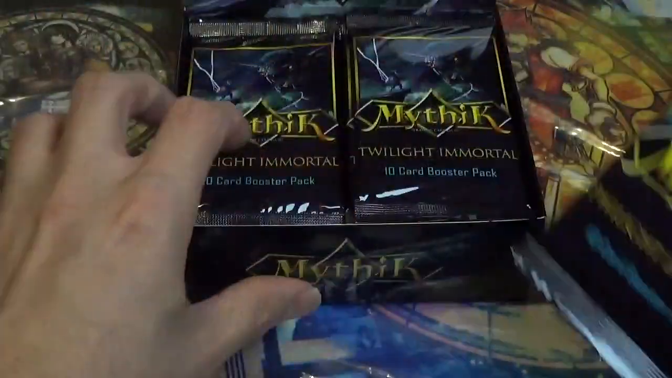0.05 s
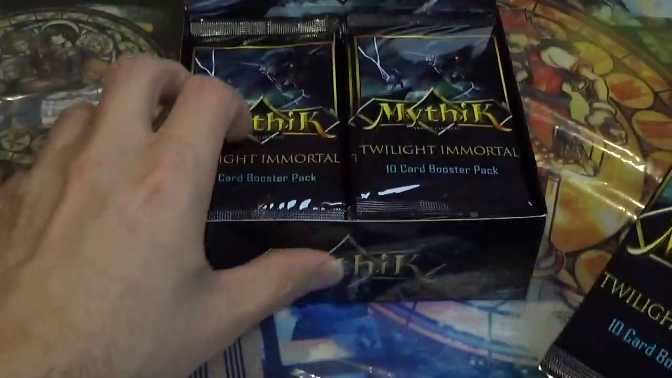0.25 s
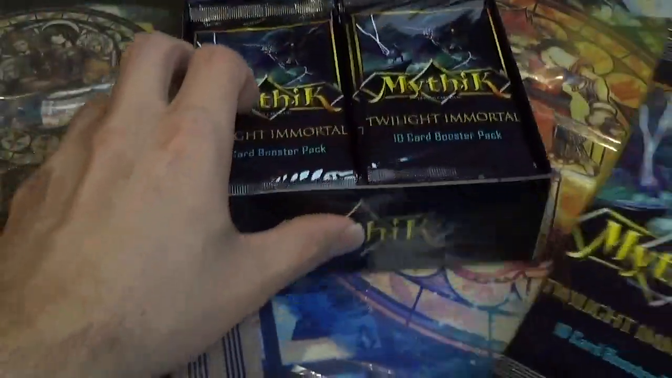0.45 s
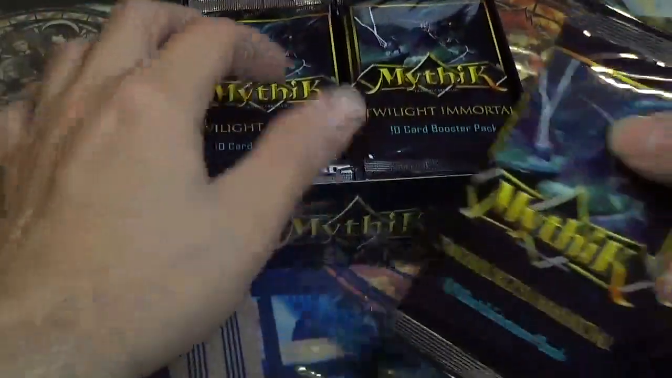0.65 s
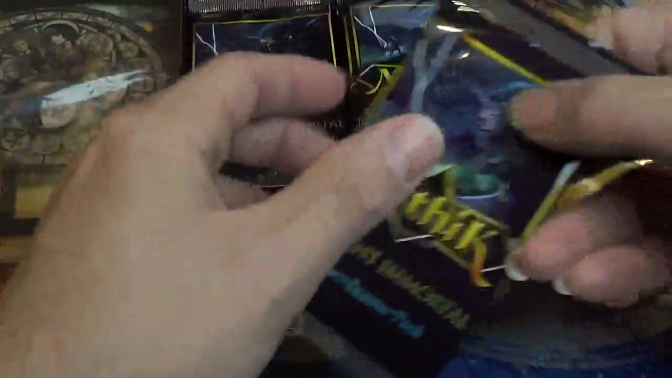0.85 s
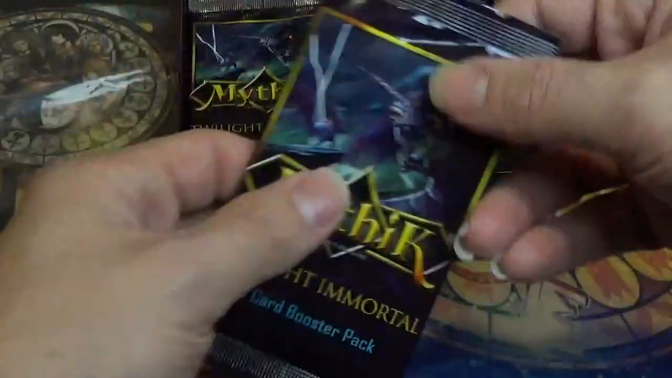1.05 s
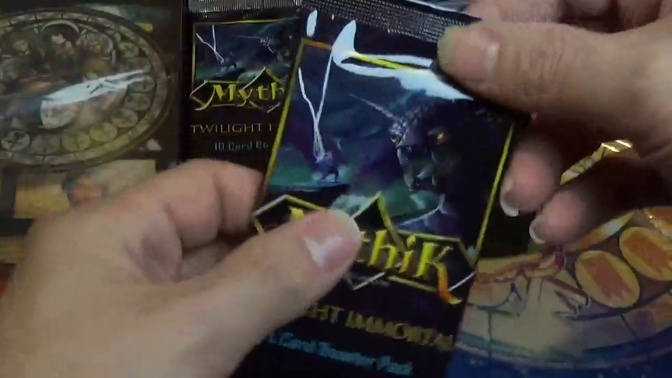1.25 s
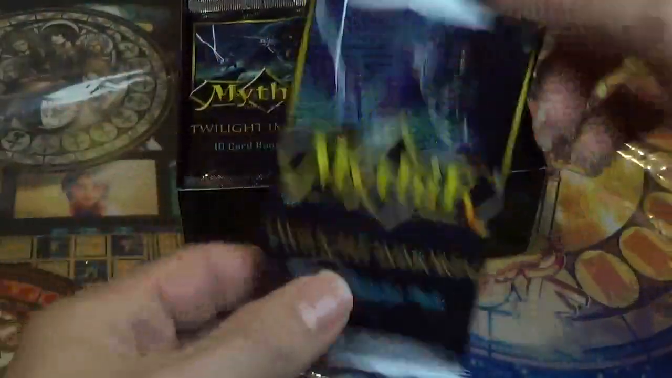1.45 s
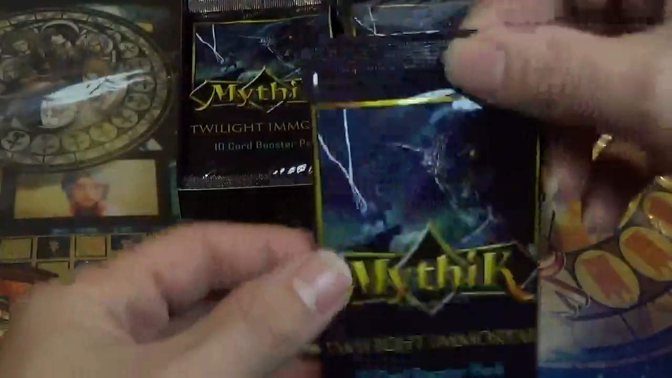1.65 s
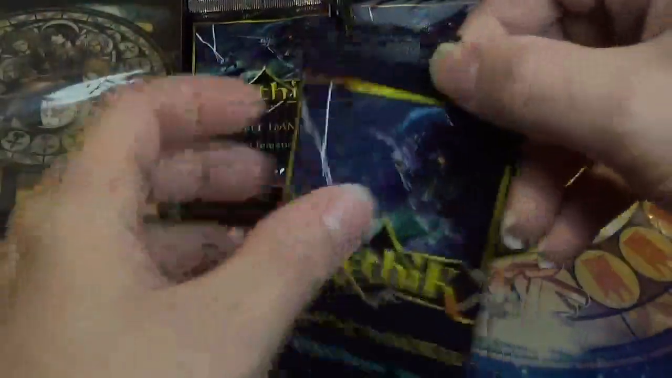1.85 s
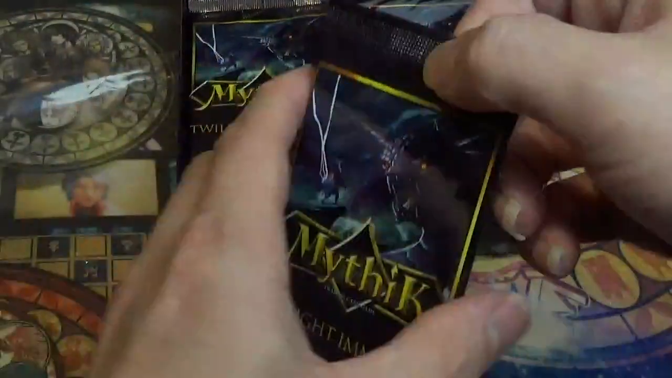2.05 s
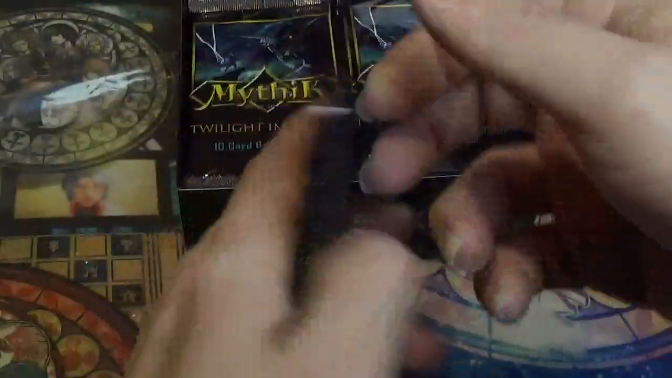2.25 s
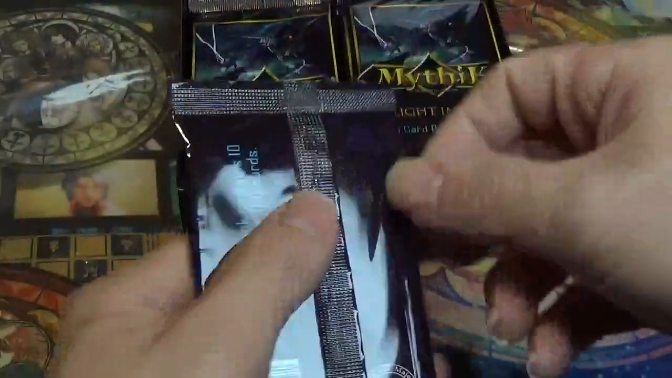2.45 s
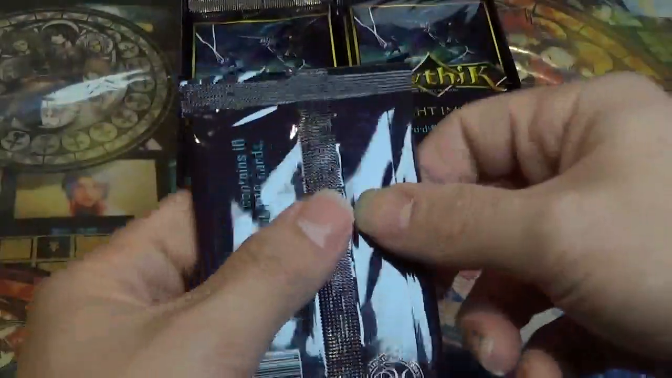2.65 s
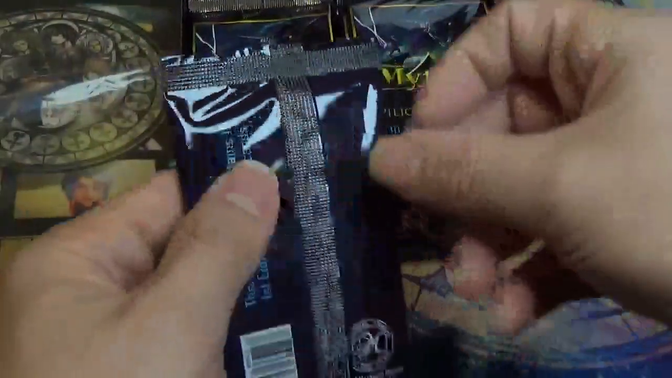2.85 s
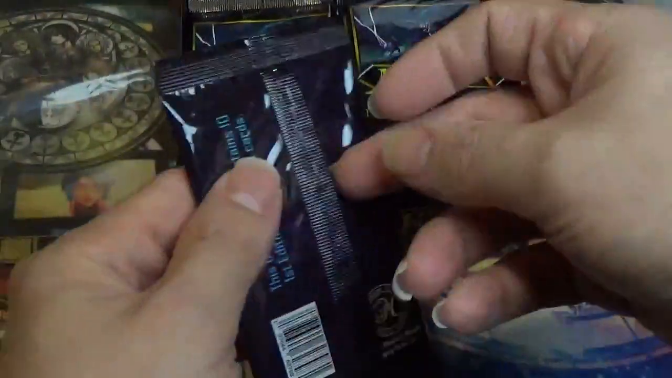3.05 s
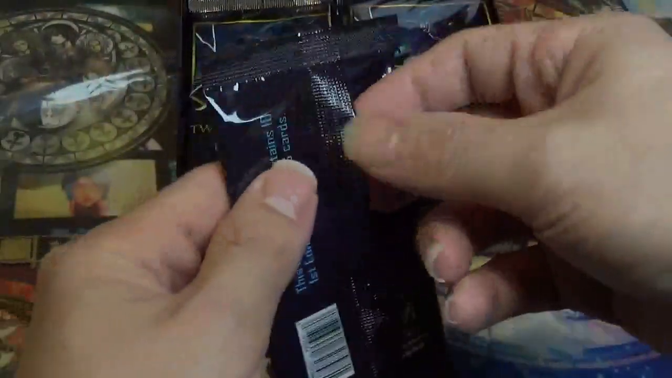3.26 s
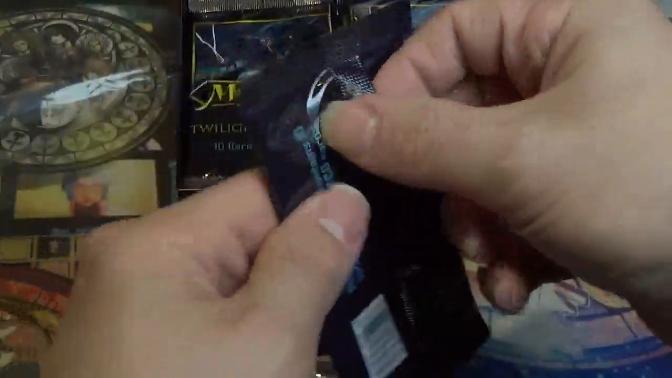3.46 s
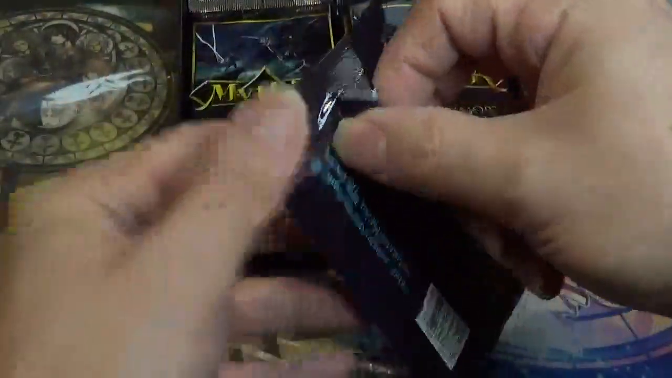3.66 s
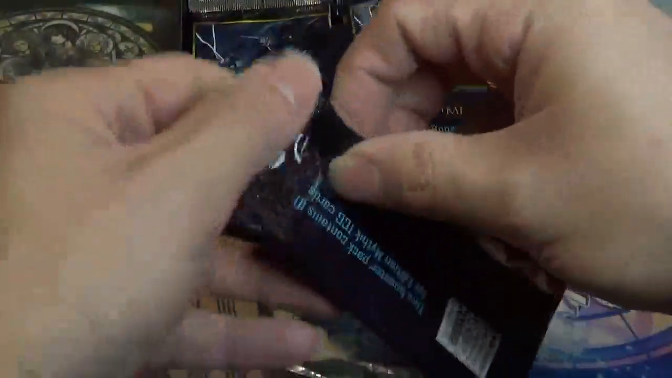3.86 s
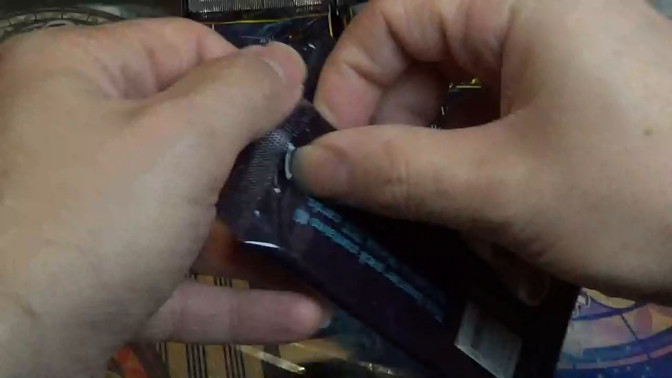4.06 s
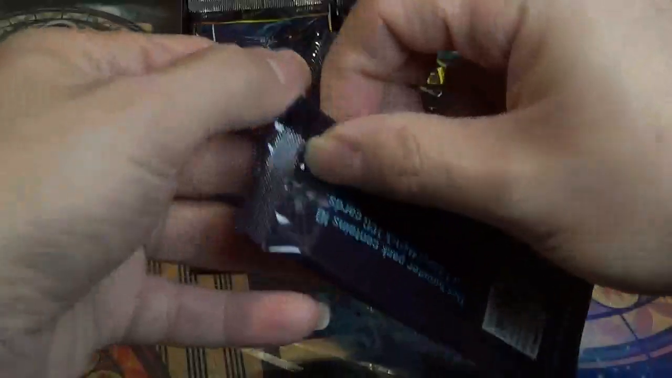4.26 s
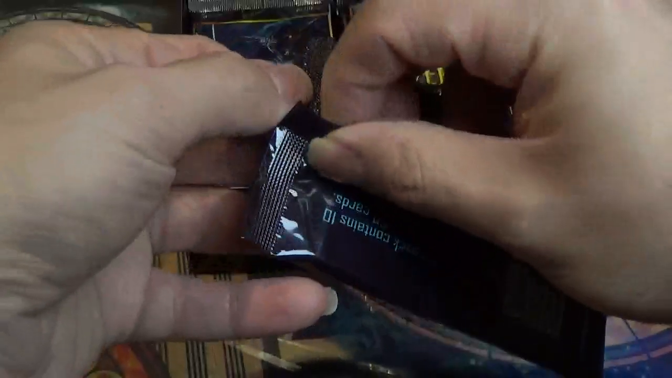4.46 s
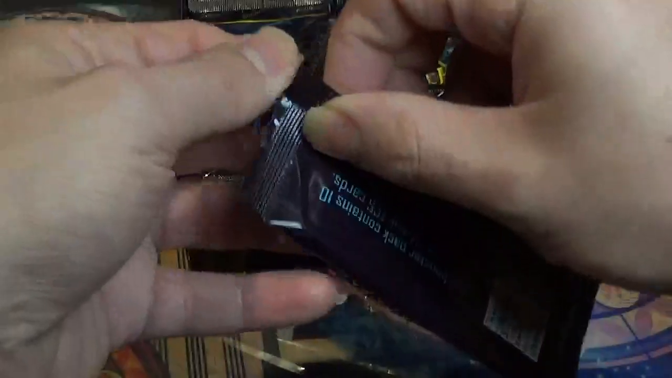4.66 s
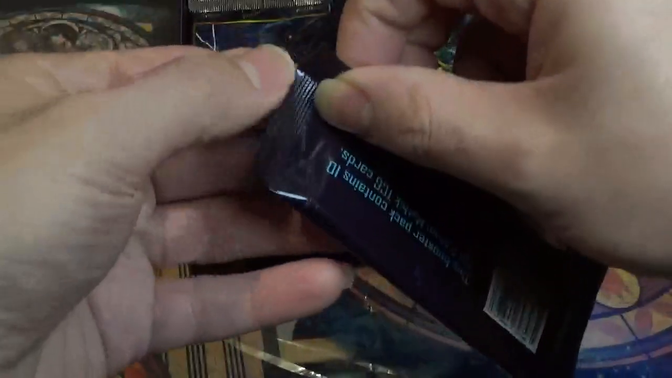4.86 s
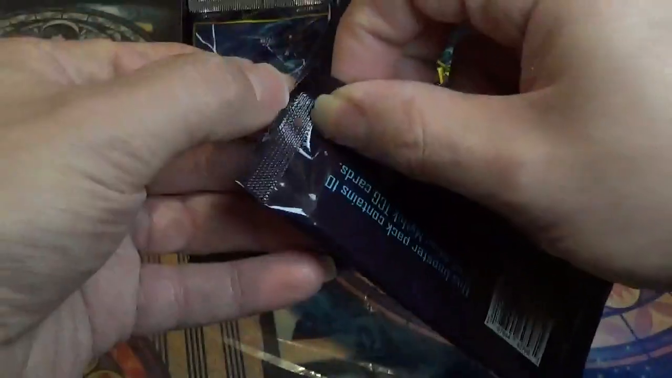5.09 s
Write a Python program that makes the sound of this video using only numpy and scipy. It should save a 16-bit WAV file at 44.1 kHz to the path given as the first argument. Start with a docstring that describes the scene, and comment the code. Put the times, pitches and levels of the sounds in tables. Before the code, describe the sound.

Recorded closely in stereo in a small room with quiet air and a barely audible wavering low hum. Two soft, dull cardboard knocks come at about 0.2 and 0.3 s, with a tiny foil crackle just after. From 0.45 to 1.2 s fingers swish faintly over film with a hollow rustle. Crisp bright crinkles appear at 1.25 to 1.7 s, with sharper ticks at 1.85 and 1.9 s. Between 2.0 and 2.5 s the packet is turned over: crackles thicken, a low soft thump lands near 2.37 s, and hollow rustle swells. It quiets from 2.5 to 3.1 s, with light rubbing and a few ticks. From 3.2 s snaps grow louder, strongest around 3.55 to 3.6 s, with short ripping bursts near 3.55, 3.8 and 4.25 s. Dense, dry, irregular foil snapping and brief tears continue through 4.9 s, still crackling at the end.

```python
"""Creases of a foil pack of cards snap one by one, each a buckling impulse that excites ringing facets.
The pack is lifted from a cardboard box, turned over and pulled open close by in a small room.
The seam rips in dense runs of fractures, and fingers slide on the film by stick and slip.
Box and cards knock softly as decaying modes; noise in a gliding band makes a hollow rustle.
Coloured noise and a faint, wavering sine give the room air and its hum."""
import sys
import numpy as np
from scipy import signal
from scipy.fft import rfft, irfft, next_fast_len
from scipy.io import wavfile

SR = 44100
rng = np.random.default_rng(int(sys.argv[2]) if len(sys.argv) > 2 else 0)


def transcribe(u):
    """Save the signal u as a 16-bit wav file named by the first command-line argument.

    u: samples, shape (n,) or (channels, n), limited to [-1, 1]; the rate is SR.
    q: integer samples, one column per channel.
    """
    v = np.clip(np.atleast_2d(u).T, -1, 1)
    q = np.round(v * 32767).astype(np.int16)
    wavfile.write(sys.argv[1], SR, q)


N = 225965
TIME = np.arange(N) / SR

# clearest crease snaps, levels before the common trim: (time [s], level [dB],
# body re level [dB], top re level [dB], facet ring [Hz])
CREASE_SNAPS = [(.318, -42, 2.5, -13, 3270), (0.3271, -46, 1, -9, 2100), (0.3315, -47.5, 7, -15, 2090),
                (.3435, -42.5, -13, -14, 4800), (0.3572, -33.5, -4, -6.5, 4750),
                (.4608, -51.5, 2.5, -5, 3630), (0.5601, -52.5, 3.5, -20, 1210),
                (1.2531, -30.5, -11.5, -5.5, 6340), (1.3333, -36, -14.5, -2, 5840),
                (1.3416, -42, -3, -2, 5570), (1.377, -44.5, -10, -5, 5900), (1.4003, -43, -7, -3.5, 5530),
                (1.5547, -41.5, -8, 4.5, 5100), (1.624, -41, -9.5, -5, 5430), (1.6668, -43, -11, 2.5, 5500),
                (1.848, -29.5, -22, 1.5, 5430), (1.9198, -29.5, -13, -1.5, 5650),
                (1.9692, -47, -4, -12, 2200), (2.0151, -42.5, 5.5, 5, 2300), (2.046, -40, 0.5, 2.5, 2650),
                (2.0522, -38.5, -31, -8, 4680), (2.116, -37.5, -11.5, -10, 4770),
                (2.1823, -39.5, -14, 6, 9200), (2.2153, -43, 7, 6, 2650), (2.236, -40.5, 4.5, 11.5, 2530),
                (2.2649, -34, -3, 0, 4500), (2.281, -35, -8.5, -1.5, 7960), (2.3904, -28, -10, -2, 5600),
                (2.4643, -33, -11, -7, 5500), (2.4766, -27.5, -37, -14, 4970),
                (2.4845, -32, -11, -2.5, 5550), (2.607, -48, -20, -20, 4900), (2.6303, -48, 1, 0.5, 7900),
                (2.648, -55.5, 7, 7, 5230), (2.9308, -34, -19, -20, 4900), (2.955, -46, 0, -4.5, 5750),
                (3.133, -44, -12, -27, 4760), (3.1545, -40.5, -8, -7.5, 4800), (3.2077, -32, -12, 2, 4140),
                (3.2167, -34, -4.5, 4.5, 9800), (3.242, -29, -18, -12, 4150), (3.251, -49, -17, 12, 5400),
                (3.2654, -25, -17.5, -5, 4670), (3.2828, -44.5, -11.5, 7, 10200),
                (3.2937, -37, -11, -11, 4370), (3.2963, -31.5, -11, -4.5, 9550),
                (3.4376, -30.5, -16.5, -2.5, 5200), (3.499, -44, -1.5, -0.5, 4430),
                (3.5426, -21, -20.5, -5.5, 3500), (3.558, -24.5, -20, -4, 4850), (3.582, -39, -18, 5, 6100),
                (3.5997, -25, -15, 2.5, 4040), (3.6021, -24.5, -11.5, -21, 6400),
                (3.6156, -47, -8, 6, 6860), (3.6708, -44.5, -12, -20, 3860), (3.6993, -34, -16, 1, 5560),
                (3.7088, -43.5, -8, -13, 4170), (3.721, -50, 3.5, -12, 1690), (3.735, -51, 5, -1, 2050),
                (3.796, -26, -17.5, -7, 4430), (3.806, -26.5, -3.5, 1, 3330),
                (3.8077, -26.5, -8, -14, 4420), (3.817, -27.5, -7.5, -1.5, 3930),
                (3.827, -34.5, -12, -14, 3600), (3.8457, -43, -4.5, 1, 5370),
                (3.8782, -36.5, -14, -18, 4170), (3.9646, -33.5, -6, -4.5, 6400),
                (3.9841, -30, -16, -3, 4460), (4.0166, -27.5, -10, -4, 4140), (4.0639, -30, -26, 7.5, 4560),
                (4.0704, -38, -4.5, 6, 6030), (4.084, -26, -13.5, -10, 4560), (4.102, -25, -16, -2.5, 4020),
                (4.1975, -28, -10.5, 2, 2300), (4.232, -38, 4.5, -20, 1330), (4.2491, -36, -10, 3.5, 4280),
                (4.2542, -32, -6.5, -14, 5870), (4.2958, -27.5, -17.5, 3.5, 9400),
                (4.3326, -28, -7.5, -1, 4450), (4.3512, -31, -29, 7, 5560), (4.3823, -26.5, -18, -6, 3640),
                (4.3957, -26.5, -4, 2.5, 8800), (4.4042, -45.5, -24, 11, 5270),
                (4.4384, -32, -22, -4, 4250), (4.5417, -25, -5, -14, 1880), (4.5706, -43.5, -9, -4, 5650),
                (4.5811, -49, 6, -8, 1110), (4.5897, -34, -9, 2, 9750), (4.5963, -36.5, -2, -5, 5340),
                (4.6264, -44, 5.5, 9, 7600), (4.6337, -34, -4, -3.5, 5500), (4.668, -29.5, -17.5, 5, 8940),
                (4.6763, -37.5, -6, -1, 6300), (4.7045, -42, -7, 4.5, 9800),
                (4.7584, -32.5, -12, 0.5, 5040), (4.815, -34, -10, 2, 8100), (4.8606, -31.5, -1, 1, 2920),
                (4.8773, -31.5, -7.5, -26, 4000), (4.8912, -33.5, -19, -27, 2690),
                (4.949, -41, -7.5, 10, 5600), (4.9734, -28.5, -9, -4, 5600),
                (4.992, -35.5, -5.5, -4.5, 3530), (5.0295, -43, -10.5, -18, 6170)]
# frequency bands of a snap, two for the body and two above: (lower edge [Hz], upper edge [Hz])
SNAP_BAND_EDGES = [(720, 1480), (1850, 3250), (3300, 6500), (6500, 11500)]
# broad resonances of the wrapper: (frequency [Hz])
WRAPPER_MODES_HZ = [1034, 2144, 4840]
# seam tearing, before a common trim:
# (start [s], end [s], level [dB], growth from start to end [dB], tilt [dB/octave])
SEAM_RIPS = [(0.324, 0.348, -43.5, -2, 0), (1.39, 1.426, -48.5, 12, 2.5), (2.222, 2.296, -44, 6, 6),
             (2.377, 2.5, -49, 2, 4), (3.199, 3.31, -61, -26, 0.5), (3.541, 3.6, -37.5, 1.5, 5.5),
             (3.776, 3.826, -37, 6, 4), (4.058, 4.108, -43.5, 3, 3.5), (4.245, 4.305, -39.5, 8, 5.5),
             (4.322, 4.419, -52, -16, 4), (4.689, 4.705, -39, 11, 6.5), (4.87, 4.893, -39, -8.5, 2)]
# spectrum of the rips: (frequency [Hz], relative spectral level [dB])
RIP_SPECTRUM = [(200, 2), (500, -1), (1000, 3), (2200, 0), (4500, -2), (7000, -6.5), (11000, -9)]
# fingers swishing over the film, before a common trim:
# (start [s], end [s], level [dB], growth from start to end [dB], tilt [dB/octave])
FINGER_SWISHES = [(.461, .525, -53.5, -3, -1.5), (.555, .62, -53.5, 6, -2), (.70, .81, -56, 9, -1.5),
                  (.81, .895, -58.5, -16, 5), (.942, 1.04, -52.5, -13, 18), (1.06, 1.2, -55.5, 11, 1.5),
                  (1.455, 1.492, -52.5, -11, 1), (1.502, 1.522, -49, -9, 5), (2.31, 2.365, -55.5, 19, 8),
                  (2.5, 2.63, -63, 8, 10), (2.69, 2.83, -59, -2.5, 7.5), (3.32, 3.37, -48.5, 16, -1),
                  (3.37, 3.42, -49, -2, 0), (3.64, 3.77, -53.5, -1, .5), (3.84, 3.92, -57.5, -7, 2),
                  (3.95, 4.06, -62.5, -25, 1), (4.145, 4.175, -49, -12, 1.5), (4.205, 4.245, -51, 16, 3),
                  (4.79, 4.815, -55, 22, 0.5), (4.935, 5.01, -54, -14, 2.5)]
# spectrum of skin on film: (frequency [Hz], relative spectral level [dB])
SWISH_SPECTRUM = [(200, -1), (500, -6), (1200, 1.5), (1700, -3), (2500, -1), (4000, 2), (5200, 2.5),
                  (6200, 0), (7400, -4), (8600, -3), (10000, 0), (11000, -7.5)]
# how busily the fingers rub, before a common trim: (time [s], level [dB])
RUB_LEVEL = [(0, -63), (.26, -62), (.38, -54.5), (.67, -67), (1.05, -60.5), (1.6, -58.5), (1.75, -65.5),
             (2.0, -59), (2.14, -64), (2.3, -57), (2.9, -68.5), (3.15, -64), (3.6, -58), (4.4, -62.5),
             (4.51, -71), (4.58, -57.5), (4.9, -62.5), (5.12, -68)]
# hollow rustle between the hands, before a common trim: (time [s], level [dB])
HOLLOW_LEVEL = [(0, -66), (.25, -78), (.54, -61), (1.68, -66), (1.85, -83), (2.12, -98), (2.24, -55),
                (2.33, -83), (2.43, -49.5), (2.55, -59.5), (2.95, -67.5), (3.5, -57.5), (3.85, -64.5),
                (4.9, -67), (5.12, -72)]
# resonance of the hollow rustle, following the grip: (time [s], frequency [Hz])
GRIP_RESONANCE = [(.58, 480), (.75, 571), (1.0, 516.2), (2.3, 500), (2.7, 380), (3.3, 390), (3.7, 460)]
# knocks of box and cards, before a common trim:
# (time [s], level [dB], contact cut-off [Hz], time to decay 60 dB [s])
SOFT_KNOCKS = [(0.1955, -32.5, 2760, 0.061), (0.3008, -29, 620, 0.036), (.33, -49, 1500, 0.36),
               (.358, -42, 1200, 0.072), (.461, -41.5, 2500, 0.038), (1.041, -43, 3000, 0.028),
               (1.923, -48, 910, 0.036), (1.961, -41, 2000, 0.019), (2.173, -39.5, 643, 0.038),
               (2.265, -42.5, 798, 0.15), (2.372, -29, 490, 0.022)]
# modes of the cardboard: (frequency [Hz], relative level [dB])
CARDBOARD_MODES = [(170, -17), (291, -8.5), (400, -2), (500, 1), (650, -11), (904, -2), (1082, -8),
                   (1260, -7.5), (1604, -21), (2300, -4)]
# spectrum of the room air: (frequency [Hz], relative spectral level [dB])
AIR_SPECTRUM = [(25, -6), (60, -5), (110, -3), (250, 4), (500, -2.5), (1000, -2.5), (3000, -9),
                (11000, -12.5)]

# a crease of FIRM_DB buckles in BUCKLE_S; the time doubles for each BUCKLE_DOUBLING_DB below it
FIRM_DB, BUCKLE_S, BUCKLE_DOUBLING_DB = -30, 0.00064, 15
FACET_Q = 5  # ring frequency over bandwidth
# facets that ring within about FACET_OCTAVES of FACET_HZ ping most clearly
FACET_HZ, FACET_OCTAVES, FACET_LIFT_DB = 2650, 0.64, 9
LOW_DB, LOW_MID_DB = -1, -3.2  # offsets of the two body bands of a snap
BASS_CUT_HZ = 160  # thin film radiates little bass
ROOM_T60_S, ROOM_DB, ROOM_WIDTH = 0.19, -13.5, 0.65
CUTOFF_HZ = 11200


def snaps(after_db=-5, ring_db=6, side_db=-1.0, side_width_hz=600, detune_octaves=0.091,
          flutter_db=-22, recoil_db=4, trim_db=-6.0, size=700, count=6):
    """Impulsive buckling: a crease jumps, neighbours follow within milliseconds, and freed facets ring."""
    out, t = np.zeros(N + size), np.arange(size) / SR
    bands = [signal.butter(2, edges, "band", fs=SR, output="sos") for edges in SNAP_BAND_EDGES]
    for s, db, body_db, top_db, ring_hz in CREASE_SNAPS:
        buckle_s = BUCKLE_S * 2 ** ((FIRM_DB - db) / BUCKLE_DOUBLING_DB)
        force = from_db(flutter_db) * rng.standard_normal(size) * np.exp(-t / buckle_s)
        force[0] += 1
        follow = np.minimum(rng.uniform(0.23, 1.9, count) * buckle_s * SR, size - 1).astype(int)
        force[follow] += from_db(after_db) * rng.uniform(0.41, 1, count) * rng.choice([-1, 1], count)

        lift_db = FACET_LIFT_DB * np.exp(-(np.log2(ring_hz / FACET_HZ) / FACET_OCTAVES) ** 2)
        ring = resonance(force, ring_hz, ring_hz / FACET_Q)
        facet = force + from_db(ring_db + lift_db) * ring
        # each fold detunes the wrapper
        detune = 2 ** rng.normal(0, detune_octaves, len(WRAPPER_MODES_HZ))
        for hz in WRAPPER_MODES_HZ * detune:
            facet += from_db(side_db) * resonance(force, hz, side_width_hz)

        low_db = body_db + LOW_DB - lift_db / 2
        low_mid_db = body_db + LOW_MID_DB + lift_db / 2
        band_db = np.array([low_db, low_mid_db, 0, top_db])
        gains = from_db(db + band_db) * [1, -1, 1, -1]  # signs let the bands join
        snap = sum(g * rms_one(signal.sosfilt(band, facet)) for g, band in zip(gains, bands))
        at = int(s * SR)
        out[at:at + size] += snap * rng.choice([-1, 1])
    body = resonance(out[:N], 510, 300)  # the whole pack recoils
    recoil = from_db(recoil_db) * passband(body, 576, "low")
    return from_db(trim_db) * (out[:N] + recoil)


def straining(relative_db=-4, earliest_s=0.002, latest_s=0.00077, hz=5500, width_hz=5000, count=3):
    """Precursory release: just before a crease jumps, the strained film ticks faintly."""
    s, db = np.array(CREASE_SNAPS)[:, :2].T
    lead_s = rng.uniform(latest_s, earliest_s, (len(s), count))
    at = ((s[:, None] - lead_s) * SR).astype(int)
    clicks = np.zeros(N)
    clicks[at] = from_db(db[:, None] + relative_db) * rng.standard_normal(at.shape)
    return resonance(clicks, hz, width_hz)


def settling(relative_db=0, settle_s=0.012, scatter_db=4, count=3):
    """Relaxation: after each snap a few small wrinkles give way, at exponentially distributed delays."""
    s, db = np.array(CREASE_SNAPS)[:, :2].T
    delay_s = rng.exponential(settle_s, (len(s), count))
    size_db = rng.normal(0, scatter_db, (len(s), count))
    at = np.minimum((s[:, None] + delay_s) * SR, N - 1).astype(int)
    clicks = np.zeros(N)
    clicks[at] = from_db(db[:, None] + size_db + relative_db) * rng.choice([-1, 1], at.shape)
    bright = resonance(clicks, 7400, 4500)
    middle = resonance(clicks, 3100, 850)
    return bright - middle + 0.72 * resonance(clicks, 1600, 500)


def crinkles(per_s=45, busy_db=-57, click_db=-28, scatter_db=4.5, pull_from_s=2.7,
             low_hz=1500, high_hz=9500, q=4, count=8):
    """Random failure: once pulled, faint creases yield more often and harder the busier the fingers."""
    effort = from_db(in_time(RUB_LEVEL)[0] - busy_db) * (TIME > pull_from_s)
    yields = rng.random(N) < per_s * effort / SR
    clicks = yields * effort * from_db(click_db + rng.normal(0, scatter_db, N))
    # each click is dealt to one of several pitches
    dealt = rng.integers(0, count, N)
    pitches_hz = np.geomspace(low_hz, high_hz, count)
    rings = sum(resonance(clicks * (dealt == k), hz, hz / q) for k, hz in enumerate(pitches_hz))
    return 2 * rings + .5 * passband(clicks, low_hz, "high")


def rips(per_s=1900, spread_db=3, trim_db=-1):
    """Successive fracture: the seam lets go in a dense run of tiny breaks."""
    return from_db(trim_db) * strokes(SEAM_RIPS, grains(per_s, spread_db), RIP_SPECTRUM, edge_s=0.0059)


def sliding(swish_db=-1, rub_db=-1, tick_db=-8, sheen_hz=6100, sheen_width_hz=900, sheen_db=-5):
    """Stick-slip friction: skin swishes and rubs on film, with a resonant sheen and stray wrinkle ticks."""
    effort = from_db(in_time(RUB_LEVEL)[0])
    swishes = strokes(FINGER_SWISHES, grains(9000, 5.8), SWISH_SPECTRUM, edge_s=0.0019)
    rub = effort * coloured(grains(8000, 4.5), SWISH_SPECTRUM)
    friction = from_db(swish_db) * swishes + from_db(rub_db) * rub
    sheen = from_db(sheen_db) * resonance(friction, sheen_hz, sheen_width_hz)
    ticks = sum(resonance(grains(130, 18.0), hz, 0.26 * hz) for hz in WRAPPER_MODES_HZ)
    return friction + sheen + from_db(tick_db) * effort * rms_one(ticks)


def strokes(rows, texture, colour, edge_s):
    """Stick-slip stretches: each swells or fades and has its own spectral tilt; the bass is cut."""
    out = np.zeros(N)
    for start, end, db, growth_db, tilt_db in rows:
        span = slice(max(int((start - edge_s) * SR), 0), int((end + edge_s) * SR))
        t = TIME[span]
        touch = np.clip(np.minimum(t - start, end - t) / edge_s / 2 + .5, 0, 1)
        progress = (t - start) / (end - start) - .5  # the listed level holds halfway
        gain = touch * from_db(db + growth_db * progress)
        out[span] += gain * coloured(texture[span], colour, tilt_db)
    return passband(out, BASS_CUT_HZ, "high", order=1)


def hollow(half_width_hz=75, trim_db=-3.5):
    """Cavity resonance: handling noise fills one band whose centre shifts with the grip."""
    (db,), (hz,) = in_time(HOLLOW_LEVEL), in_time(GRIP_RESONANCE)
    # slow noise on two carriers in quadrature becomes a noise band around hz
    a, b = passband(rng.standard_normal((2, N)), half_width_hz, "low")
    phase = 2 * np.pi * np.cumsum(hz) / SR
    return from_db(db + trim_db) * rms_one(a * np.cos(phase) + b * np.sin(phase))


def knocks(trim_db=-5, rattle_db=9, rattle_hz=1500, size=6000):
    """Modal impact: each touch rings the cardboard and jostles the cards; soft contact omits the highs."""
    out, t = np.zeros(N + size), np.arange(size) / SR
    hz, mode_db = np.transpose(CARDBOARD_MODES)
    for s, db, contact_hz, t60 in SOFT_KNOCKS:
        strength = from_db(mode_db + rng.normal(0, 0.66, len(hz))) * rng.choice([-1, 1], len(hz))
        modes = strength @ np.sin(2 * np.pi * np.outer(hz, t))
        ring = passband(modes, contact_hz, "low")
        rattle = passband(rng.standard_normal(size), [240, rattle_hz], "band", order=1)
        rattle = from_db(rattle_db) * passband(rattle, contact_hz, "low", order=1)
        decay = from_db(db + trim_db - 60 * t / t60)
        at = int(s * SR)
        out[at:at + size] += decay * (ring + rattle)
    return out[:N]


def thud(at_s=2.373, hz=170, start_db=-37, t60=0.019):
    """Damped oscillation: the stack of cards drops against the palm as the pack is turned over."""
    t = np.maximum(TIME - at_s, 0)
    return from_db(start_db - 60 * t / t60) * np.sin(2 * np.pi * hz * t)


def room(x, first_s=0.00022, wall_hz=8000, table_s=0.0073, table_width_s=0.0053, table_db=2, size=14000):
    """Reverberation: a short decaying wall tail and a table's scattered early echo, wide in stereo."""
    t = np.arange(size) / SR
    mid, side = passband(rng.standard_normal((2, size)), min(wall_hz, SR / 3), "low", order=1)
    walls = from_db(-60 * t / ROOM_T60_S) * np.clip(t / first_s - .5, 0, 1)
    table = from_db(table_db) * np.exp(-((t - table_s) / table_width_s) ** 2)
    tail = (mid + ROOM_WIDTH * side * [[1], [-1]]) * (walls + table)
    tail *= from_db(ROOM_DB) / np.sqrt(np.sum(tail ** 2) / 2)
    return signal.fftconvolve(x[None], tail, axes=1)[:, :N]


def background(air_db=-68, hum_hz=68, hum_db=-80, waver=0.31, waver_hz=5, width=0.72):
    """Stationary noise and amplitude modulation: quiet room air with a low, wavering hum."""
    mid, side = coloured(rng.standard_normal((2, N)), AIR_SPECTRUM)
    air = mid + width * side * [[1], [-1]]
    swell = 1 + waver * rms_one(passband(rng.standard_normal(N), waver_hz, "low"))
    hum = swell * np.sqrt(2) * np.sin(2 * np.pi * hum_hz * TIME)
    return from_db(air_db) * air + from_db(hum_db) * hum


def grains(per_s, spread_db, length=N):
    """Random impulse process: tiny slips at random moments, many weak and a few strong."""
    draw = rng.random((length, 3))
    sizes = from_db(abs(spread_db) * np.minimum(-np.log(draw[:, 0] + 1e-9), 4))
    slips = draw[:, 1] < per_s / SR
    return rms_one(slips * sizes * np.sign(draw[:, 2] - .5))


def coloured(x, colour, tilt_db=0):
    """Spectral shaping: a smooth spectrum, tilted by so many dB per octave, at rms 1."""
    hz, db = np.transpose(colour)
    length = x.shape[-1]
    size = next_fast_len(length)
    bins = np.maximum(np.fft.rfftfreq(size, 1 / SR), 1)
    bin_db = np.interp(np.log(bins), np.log(hz), db + tilt_db * np.log2(hz))
    gain = from_db(bin_db) * (bins < CUTOFF_HZ + 500)
    return rms_one(irfft(rfft(x, size) * gain, size)[..., :length])


def resonance(x, hz, width_hz):
    """Damped resonator: two poles, with gain near 1 at the peak."""
    r = np.exp(-np.pi * width_hz / SR)
    zeros = np.array([1, 0, -1]) * (1 - r * r) / 2
    poles = [1, -2 * r * np.cos(2 * np.pi * hz / SR), r * r]
    return signal.lfilter(zeros, poles, x)


def passband(x, hz, kind, order=2):
    """Band limitation: a causal Butterworth filter."""
    return signal.sosfilt(signal.butter(order, hz, kind, fs=SR, output="sos"), x + 1e-18)


def in_time(rows):
    """Linear interpolation: each column of a curve at every sample."""
    s, *columns = np.transpose(rows)
    return [np.interp(TIME, s, c) for c in columns]


def rms_one(x):
    """Power normalisation: scale to rms 1."""
    return x / np.sqrt(np.mean(x ** 2) + 1e-20)


def from_db(db):
    """Logarithmic level: decibels to amplitude gain."""
    return 10 ** (np.asarray(db) / 20)


def scene():
    """Superposition: centred direct sound, its reverberation and the background add up."""
    foil = straining() + snaps() + settling() + crinkles() + rips() + sliding()
    # light card gives little bass
    card = passband(knocks(), 260, "high") + passband(thud(), 74, "high")
    pack = foil + hollow() + card
    return pack + room(pack) + background()


def record(dry):
    """Port resonance: the two microphone ports ring slightly differently; the top is cut steeply."""
    left = dry[0] + 0.14 * resonance(dry[0], 6360, 1900) + 0.1 * resonance(dry[0], 3640, 1360)
    right = dry[1] + 0.25 * resonance(dry[1], 2900, 1300) + 0.35 * resonance(dry[1], 10200, 2200)
    ports = np.array([left, right]) * from_db(-0.4)
    top_cut = signal.firwin(161, CUTOFF_HZ, fs=SR)
    return signal.fftconvolve(ports, top_cut[None], "same", axes=1)


dry = scene()
out = record(dry)
transcribe(out)
```